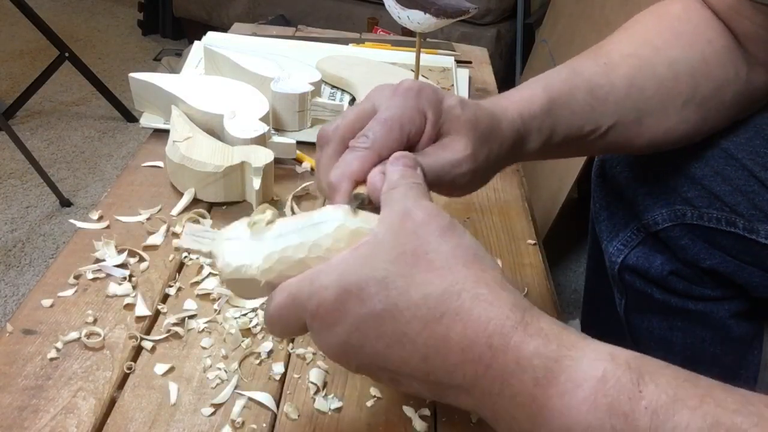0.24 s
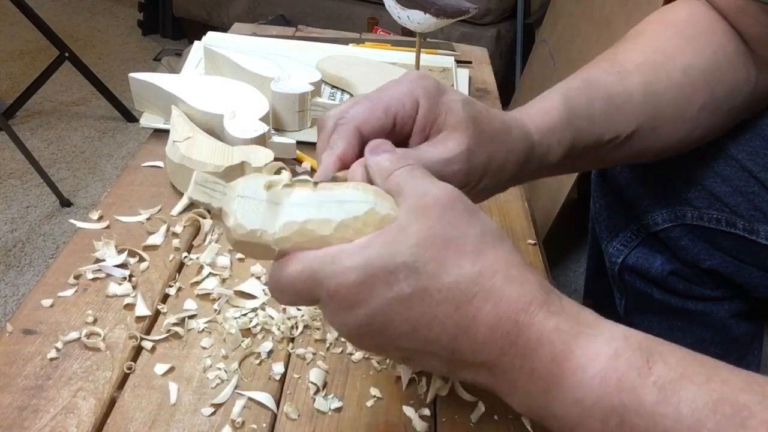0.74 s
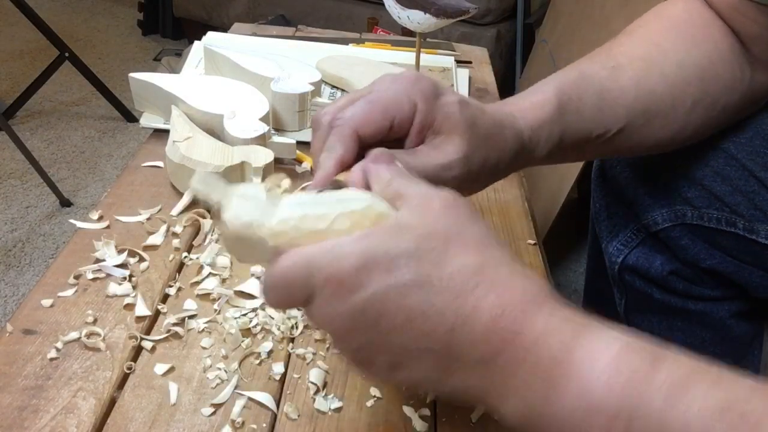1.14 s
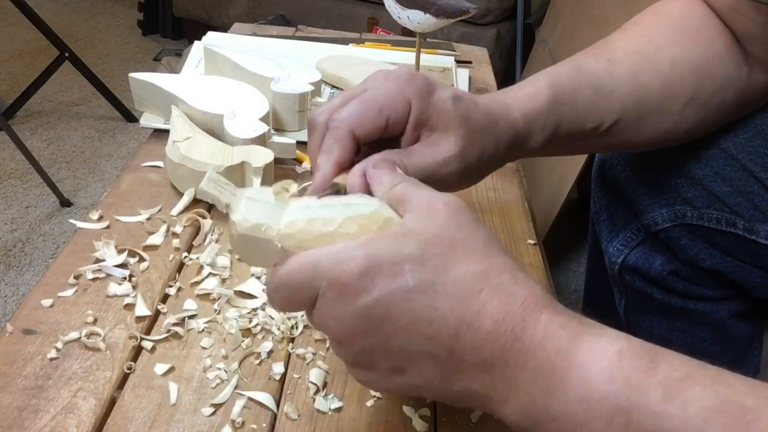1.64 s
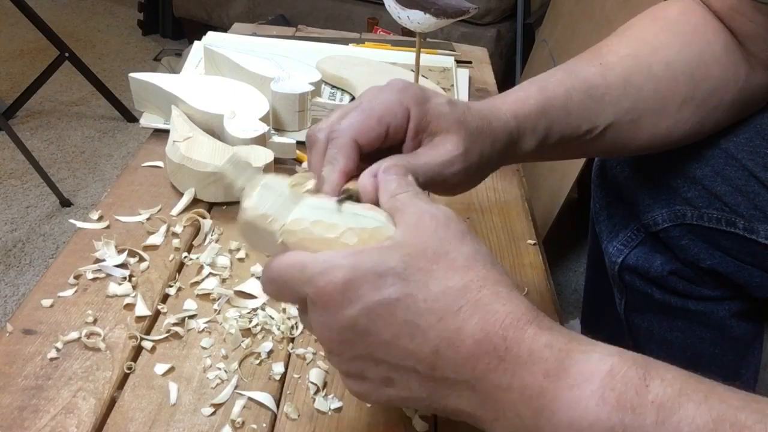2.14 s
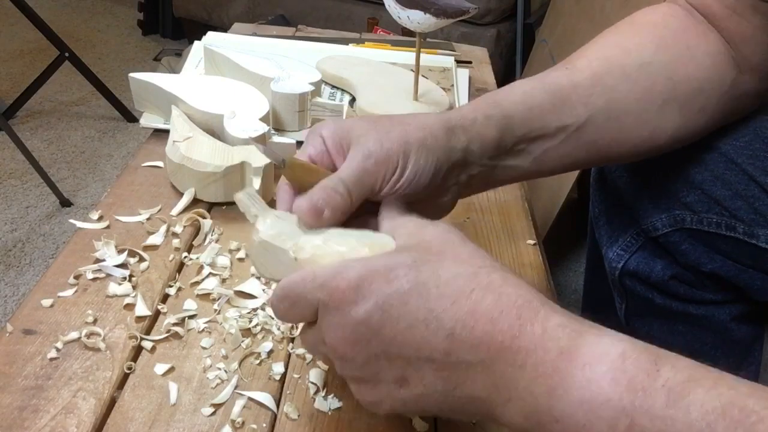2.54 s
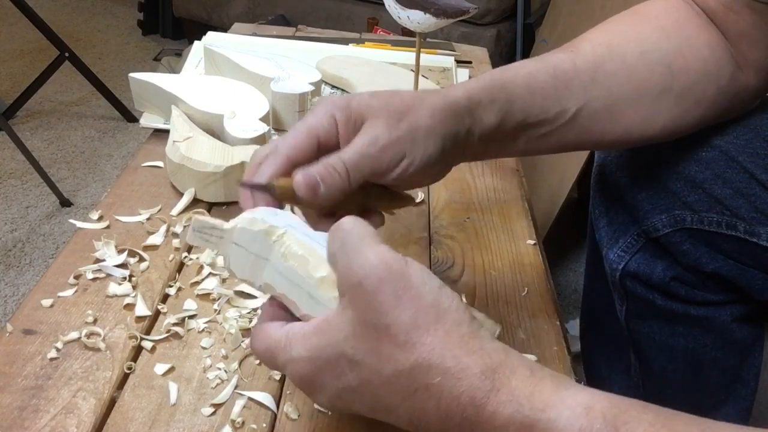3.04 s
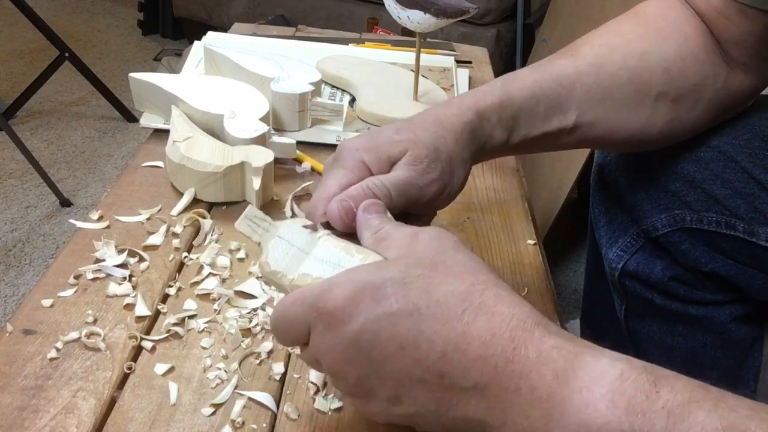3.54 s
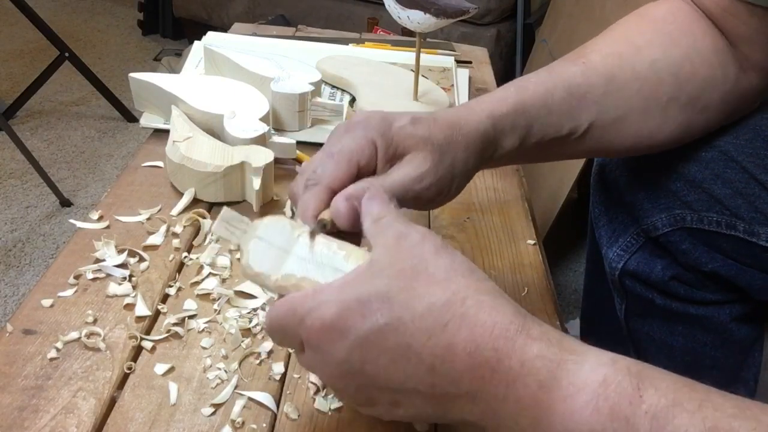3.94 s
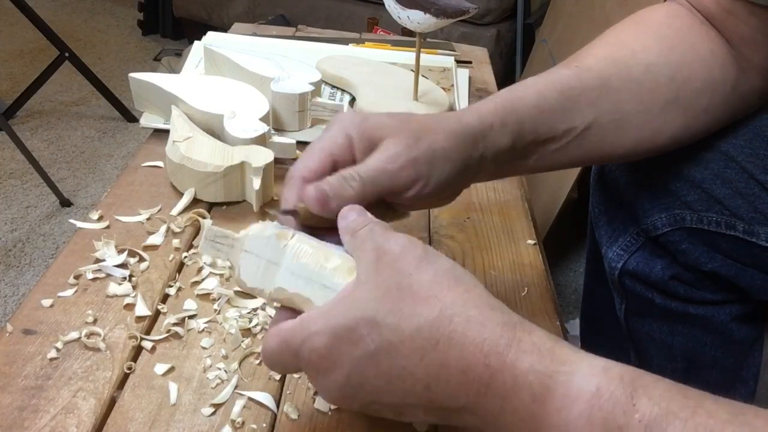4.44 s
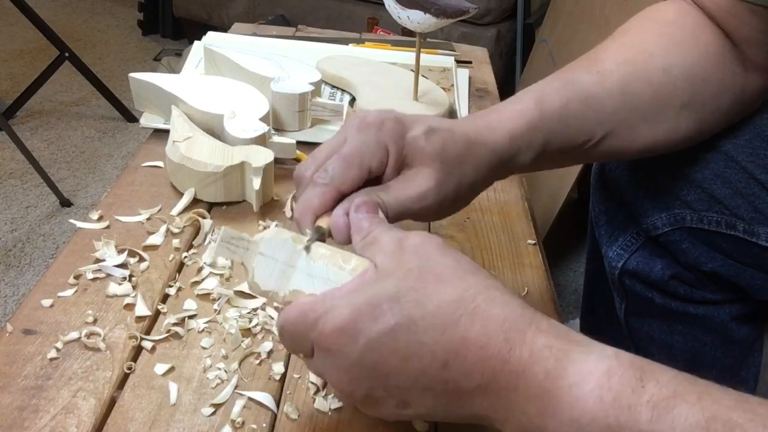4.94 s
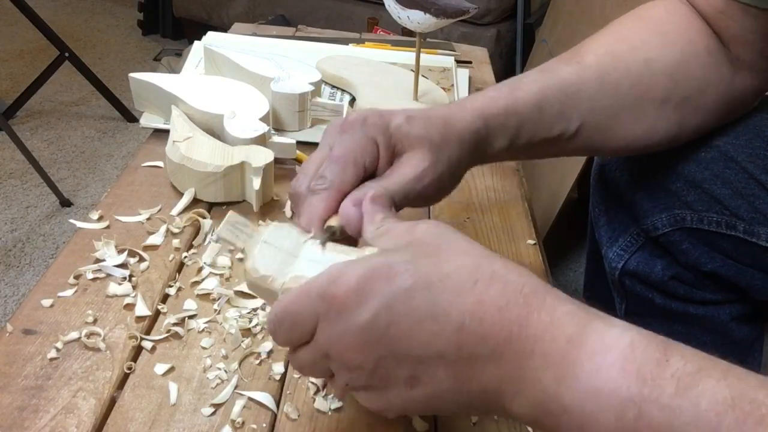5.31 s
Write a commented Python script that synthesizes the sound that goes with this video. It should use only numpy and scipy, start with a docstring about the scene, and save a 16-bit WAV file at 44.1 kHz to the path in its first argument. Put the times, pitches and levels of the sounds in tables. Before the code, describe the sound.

A small knife whittles a hand-held wooden block. Short, dry rasps end in crisp snaps as shavings break free, about two a second at first, some with a soft thud. Midway the cuts thin out into light scrapes and ticks of the blade, then a few quicker cuts follow near the end. The sound is close, in a quiet room with faint hum and hiss.

```python
"""Dry rasps end in sharp snaps: a small knife pares shavings off a hand-held wooden block.
The edge advances by stick-slip friction and cracks fibres until the shaving breaks free, often with
a soft thud as the block jolts in the hand. Between cuts the blade slides and ticks lightly on the wood.
Block and blade ring in their damped modes; bench and walls return a short, bright tail
over the low hum and hiss of a quiet room."""
import sys
import numpy as np
from scipy import signal
from scipy.fft import rfft, irfft
from scipy.io import wavfile

SR = 44100
rng = np.random.default_rng(int(sys.argv[2]) if len(sys.argv) > 2 else 0)


def to_wav(sig):
    """Store sig (one row per channel, or 1-D mono) as 16-bit WAV at the path in sys.argv[1].

    Samples outside -1..1 are clipped; the rate is SR.
    """
    pcm = np.clip(np.atleast_2d(sig), -1, 1) * 32767
    pcm = np.round(pcm).astype(np.int16)
    wavfile.write(sys.argv[1], SR, pcm.T)  # frames by channels


N = 245637

# Strokes of the edge; grip and angle set the colour. Body and fizz are relative to the crack band.
# bite_s, release_s, level_db, swell_db, upper_blade_hz, wood_hz, blade_hz, body_db, fizz_db
CUTS = [(0.173, 0.272, -74.5, 17.5, 13000, 1420, 7700, -8.5, -6.5),
        (0.538, 0.68, -66.5, 9, 13700, 1757, 7360, -5.5, -5.5),
        (0.965, 1.132, -71, 15.5, 13400, 1790, 8020, -5, -4.5),
        (1.487, 1.603, -66.5, 5, 12400, 1870, 7970, -4, -7),
        (1.84, 1.96, -68, -12, 12600, 2070, 7910, -3, -2),
        (2.216, 2.271, -61, 9.5, 11970, 2060, 5510, -13.5, -4),
        (2.502, 2.625, -68.5, 17.5, 12400, 2390, 7130, -4.5, -0.5),
        (3.463, 3.587, -69, 3, 12100, 2000, 6130, -6, -6),
        (3.974, 4.058, -68, 10, 14600, 2750, 8450, -3, -4),
        (4.787, 4.862, -68.5, 6.5, 12000, 2670, 6350, -0.5, -3),
        (5.057, 5.126, -64.5, 13, 14400, 1880, 6170, -7, -7),
        (5.331, 5.4, -59, -3, 12400, 1980, 6100, -5.5, -1.5),
        (5.522, 5.558, -63.5, 7.5, 10500, 2200, 6870, -13.5, -1)]
def cutting(click, trim_db=1.5, bite_s=0.0053, swell_s=0.025, release_s=0.011):
    """Friction noise follows force: the edge bites, holds, swells or eases near release, then lets go."""
    t, force = np.arange(N) / SR, np.zeros(N)
    for start, end, db, swell_db, *_ in CUTS:
        bite = np.clip((t - start) / bite_s, 0, 1)
        swell = gain_of(swell_db * np.exp(-abs(t - end) / swell_s))
        release = np.exp(-np.maximum(t - end, 0) / release_s)
        force += gain_of(db + trim_db) * bite * swell * release
    colour = curves([(s, *cut[4:]) for cut in CUTS for s in cut[:2]])
    return rasp(click, force, *colour, fibres_per_s=1600, spread_db=1.0, judder_db=2.0, slip_db=2.5)


# Resonances of block and blade that colour all rubbing: centre_hz, width_hz, gain_db
RUB_RESONANCES = [(2055, 250, -6.5), (2960, 490, -10), (5830, 300, -11.5), (7420, 255, -4.5),
                  (8740, 190, -4)]
def rasp(click, force, upper_hz, wood_hz, blade_hz, body_db, fizz_db,
         fibres_per_s, spread_db, judder_db, slip_db):
    """Stick-slip friction: a random train of fibre breaks, made uneven as the edge catches and slips."""
    density = np.maximum(force / gain_of(-67), 1) ** 0.9  # a deeper cut crackles more densely
    sizes = gain_of(spread_db * np.minimum(rng.exponential(1, N), 4))
    sizes = sizes * rng.choice([-1, 1], N) / np.sqrt(density)
    breaks = rng.random(N) < fibres_per_s * density / SR
    stick_slip = gain_of(judder_db * wander(rate_hz=650) + slip_db * wander(rate_hz=140))
    wood = signal.oaconvolve(sizes * breaks * stick_slip, click)[:N]
    wood = wood + sum(gain_of(db) * resonate(wood, hz, width) for hz, width, db in RUB_RESONANCES)
    knock, body, crack, fizz = split_bands(wood)
    body = emphasise(body, wood_hz, width_hz=600, share=0.28)
    crack = emphasise(crack, blade_hz, width_hz=520, share=0.52)
    fizz = emphasise(fizz, upper_hz, width_hz=900, share=0.35)
    return force * (crack + gain_of(body_db) * (body + gain_of(-14.5) * knock) + gain_of(fizz_db) * fizz)


# Spectrum of cracking wood: frequency_hz, gain_db
WOOD_SPECTRUM = [(300, -11.5), (700, -15.5), (1000, -19), (1400, -11), (2050, -9.5), (2900, -9.5),
                 (4300, -12.5), (5100, -5.5), (5950, 1), (6700, -2), (8400, -1), (10000, -9), (12500, -5.5),
                 (15500, -7)]
def fibre_click(size=1024):
    """Impulse response of one breaking fibre: a minimum-phase click with the spectrum of the wood."""
    log_gain = np.log(gain_of(spectrum_at(WOOD_SPECTRUM, abs(np.fft.fftfreq(size, 1 / SR)))))
    minimum_phase = np.exp(np.conj(signal.hilbert(log_gain)))
    return np.fft.ifft(minimum_phase).real[:size // 2]


# Shavings breaking free. Knock, body and fizz are relative to the crack band;
# ring is low where the blade stays pressed on the wood.
# centre_s, length_ms, level_db, knock_db, body_db, fizz_db, wood_hz, blade_hz, ring_db
SHAVING_SNAPS = [(0.288, 8.8, -50, -9, -16, -8, 1520, 8100, -2.5),
                 (0.6757, 5.8, -40.5, -32, -23, -4, 1510, 9000, -3.5),
                 (1.1267, 3.4, -39, -17.5, -13, 2, 3720, 6170, -4),
                 (1.1289, 2.74, -29.5, -34, -19, -6, 2520, 5250, 0.5),
                 (1.6043, 4.4, -37.5, -15, -8.5, -6.5, 1920, 5800, 2.5),
                 (1.607, 3.2, -37.5, -22, -11.5, -8.5, 3940, 6800, -8),
                 (1.9654, 0.76, -23, -25, -9, 3, 1730, 8870, -4),
                 (1.9672, 0.86, -19, -26.5, -18, -17, 1800, 6100, -2),
                 (1.97, 4.5, -33, -26.5, -18.5, -8, 3260, 7350, 5),
                 (1.986, 1.6, -37, -20, -11, -10.5, 1850, 7660, 0),
                 (2.6303, 0.62, -30.5, -43, -12, -7, 2720, 7150, -1.5),
                 (3.5754, 0.58, -30.5, -51, -10, -10, 3420, 9300, -2),
                 (3.5806, 2.2, -39.5, -23, -9.5, -11, 2640, 6500, -5),
                 (4.0489, 7.3, -56.5, -35, -2, -3, 3030, 8700, 1),
                 (4.8587, 2.9, -35, -21, -12, -9, 2740, 6460, -2),
                 (5.1047, 9.7, -42, -24, -9, -6, 1870, 6000, -7),
                 (5.1163, 1.83, -25.5, -15, -12.5, -25, 2100, 6330, -3.5),
                 (5.3994, 3.4, -35, -21, -5, -2.5, 2030, 8300, 2.5),
                 (5.4021, 1.6, -25.5, -29, -7.5, -7, 1840, 5330, -4.5)]
def snaps(click, rows, spread_db=2.0, skirt=0.39, wood_width_hz=280, blade_width_hz=600,
          wood_share=1.6, blade_share=1.0, size=2048):
    """Brittle fracture: a brief avalanche of cracks. Returns the direct sound and the part that rings."""
    direct, undamped = np.zeros(N), np.zeros(N)
    t = (np.arange(size) - size // 4) / SR
    for s, ms, db, knock_db, body_db, fizz_db, wood_hz, blade_hz, ring_db in rows:
        length_s = ms / 1000
        core = np.exp(-(t / (0.55 * length_s)) ** 4)
        flanks = np.exp(-abs(t) / length_s) * np.where(t < 0, 1, 0.5)  # soft lead-in, weaker fade after
        impulses = rng.standard_normal(size) * gain_of(spread_db * rng.standard_normal(size))
        burst = signal.fftconvolve((core + skirt * flanks) * impulses, click)[:size]
        knock, body, crack, fizz = split_bands(burst)
        knock = emphasise(knock, hz=970, width_hz=300, share=3.2)  # hollow note of the block
        body = emphasise(body, wood_hz, wood_width_hz, wood_share)
        crack = emphasise(crack, blade_hz, blade_width_hz, blade_share)
        colour = crack + gain_of(knock_db) * knock + gain_of(body_db) * body + gain_of(fizz_db) * fizz
        snap = gain_of(db) * np.sqrt(length_s * SR / size) * colour  # energy grows with duration
        add(direct, s + t[0], snap)
        add(undamped, s + t[0], gain_of(ring_db) * snap)
    return direct, undamped


# Fibres giving way around the edge: centre_s, length_ms, level_db
FIBRE_CRACKS = [(0.2594, 0.9, -54), (0.2794, 4.9, -51), (0.6085, 0.92, -48), (0.6293, 2.1, -45.5),
                (0.6337, 0.5, -42), (0.662, 1, -47), (1.1097, 1.6, -53.5), (1.524, 4.3, -58),
                (1.5774, 4.2, -49.5), (1.8973, 5.6, -54.5), (2.223, 3.9, -56), (2.5441, 2.9, -45.5),
                (3.5965, 1.1, -46.5), (3.983, 2.4, -63), (4.032, 4.6, -62), (4.853, 0.49, -42),
                (5.088, 3, -50.5), (5.1125, 2.4, -40.5), (5.3277, 3.3, -50.5), (5.3547, 3, -52),
                (5.3704, 2.2, -52), (5.3754, 1.4, -55), (5.3853, 1.7, -51)]
def fibre_cracks(click, knock_db=-21, ring_db=2):
    """Local fracture: overstressed fibres give small snaps with the colour of the nearest cut."""
    rows = []
    for s, ms, db in FIBRE_CRACKS:
        nearest_cut = min(CUTS, key=lambda cut: abs((cut[0] + cut[1]) / 2 - s))
        *_, wood_hz, blade_hz, body_db, fizz_db = nearest_cut
        rows.append((s, ms, db, knock_db, body_db - 1, fizz_db - 1, wood_hz, blade_hz, ring_db))
    return snaps(click, rows, skirt=0.12, wood_share=0.47, blade_share=0.57)


# Taps as the blade is set down or lifted: centre_s, length_ms, level_db, body_db, fizz_db, wood_hz
BLADE_TICKS = [(1.2518, 1.3, -56, -4.5, 5.5, 3510), (1.7155, 2.6, -52, -4.5, -5.5, 4070),
               (2.122, 3.7, -62, -1, 2.5, 4130), (2.2968, 0.52, -57, -2.5, 5, 3530),
               (2.399, 1.3, -63, 0.5, 2, 4250), (2.4164, 0.33, -55.5, -6, -3, 4300),
               (3.014, 1.7, -58, 2, -12, 3550), (3.199, 0.81, -56, -2.5, -5, 2560),
               (3.6952, 0.76, -32, -4, -28, 3220), (3.6994, 1.3, -36.5, -6, -24, 3250),
               (3.703, 0.33, -37.5, -6, -3.5, 1870), (3.9001, 1.5, -53.5, 9, -10, 2420),
               (4.115, 0.8, -56.5, 2, 1, 3550), (4.2274, 2.6, -44, -4, -4.5, 3960),
               (4.2463, 1.3, -57, -23, -12, 4200), (4.3283, 0.88, -54.5, -0.5, -0.5, 2700),
               (4.6336, 1.14, -55.5, -3, -30, 4360), (4.653, 1.4, -60, -1, -24, 4370)]
def blade_ticks(click, blade_hz=5900, ring_db=-5):
    """Damped impact: each tap is a small, dry snap, since the wood damps the resting blade."""
    rows = [(s, ms, db, body_db - 20, body_db, fizz_db, wood_hz, blade_hz, ring_db)
            for s, ms, db, body_db, fizz_db, wood_hz in BLADE_TICKS]
    return snaps(click, rows, spread_db=7, skirt=0.1, wood_width_hz=450, blade_width_hz=650,
                 wood_share=3.4)


# Blade and fingers brushing the block: centre_s, length_s, level_db, blade_hz, fizz_db
SLIDES = [(0.003, 0.072, -64, 5640, -5), (0.128, 0.054, -63.5, 5600, -8), (0.37, 0.053, -65.5, 7900, -5),
          (0.419, 0.019, -65.5, 7000, -8), (0.807, 0.18, -76, 7250, -5), (1.213, .12, -75.5, 7900, 0),
          (1.388, 0.041, -72, 7650, -13), (1.769, 0.011, -63.5, 7900, -5), (2.124, 0.11, -65.5, 7700, -4),
          (2.359, 0.047, -66.5, 7140, -7), (2.687, 0.065, -62.5, 7120, -3),
          (2.772, 0.044, -65.5, 7400, -1.5), (2.912, 0.057, -57, 7260, -0.5),
          (3.055, 0.11, -71.5, 7200, -2.5), (3.217, 0.18, -85, 6900, -2), (3.41, 0.16, -72.5, 5850, -8),
          (3.688, 0.21, -75, 5860, -3), (4.123, 0.039, -62, 6100, -2), (4.212, 0.064, -66, 6100, -14),
          (4.515, 0.12, -74, 7140, -7), (4.673, 0.031, -66.5, 5700, -12), (4.996, 0.066, -68, 6070, -10)]
def sliding(click, trim_db=-3.5, handling_db=-87):
    """Light sliding friction: contact force rises and falls in a bell, with a finer grain than a cut."""
    t = np.arange(N) / SR
    force = np.full(N, gain_of(handling_db))  # the hands never rest entirely
    for s, length_s, db, *_ in SLIDES:
        force += gain_of(db + trim_db) * np.exp(-(2 * (t - s) / length_s) ** 2)
    blade_hz, fizz_db = curves([(s, *colour) for s, _, _, *colour in SLIDES])
    return rasp(click, force, upper_hz=11300, wood_hz=2290, blade_hz=blade_hz, body_db=-9.5,
                fizz_db=fizz_db, fibres_per_s=2600, spread_db=-0.5, judder_db=1.9, slip_db=3.0)


# Jolts of the block as the blade comes free: start_s, level_db, pitch_hz
THUDS = [(0.292, -65, 120), (0.681, -59, 118), (1.13, -49.5, 123), (1.604, -44, 139), (1.968, -43, 148),
         (4.858, -54, 222), (5.116, -55, 156), (5.401, -52.5, 197)]
def thuds(rise_s=0.0028):
    """Heavily damped oscillation: suddenly unloaded, the hand-held block swings two or three cycles."""
    out, t = np.zeros(N), np.arange(SR // 10) / SR
    envelope = t / rise_s * np.exp(1 - t / rise_s)
    for s, db, hz in THUDS:
        add(out, s, -gain_of(db) * envelope * np.sin(2 * np.pi * hz * t))
    return out


# Natural modes of blade and block: pitch_hz, relative_db, t60_s
MODES = [(5500, -8, 0.059), (5670, -22, 0.089), (5870, -13.5, .12), (6450, -22, 0.076), (7400, -19, 0.196),
         (7870, -7.5, 0.058), (8020, -12, 0.097), (9390, 20.5, 0.043), (11100, -12, 0.16),
         (12400, -7.5, 0.078), (14200, 11, .11), (13900, -21, .1)]
def ringing(excitation, level_db=-29, build_s=0.0049):
    """Free vibration: every crack excites modes that take a moment to build, then decay exponentially."""
    t = np.arange(SR // 4) / SR
    modes = sum(gain_of(db) * decay(t, t60_s) * np.sin(2 * np.pi * (hz * t + rng.random()))
                for hz, db, t60_s in MODES)
    modes = modes * (1 - np.exp(-t / build_s))
    return gain_of(level_db) * signal.oaconvolve(excitation, modes / np.linalg.norm(modes))[:N]


# Early reflections off bench, hands and walls: delay_s, relative_gain
REFLECTIONS = [(.0031, 0.11), (.0056, .07), (.0069, .05), (0.011, 0.082), (.0122, .04), (.0205, 0.03)]
# Spectrum of the diffuse tail: frequency_hz, relative_db
TAIL_SPECTRUM = [(300, 2), (700, 1), (1500, -5.5), (3700, 4.5), (5000, 3), (6000, -4), (7400, 4), (8800, 1),
                 (10500, 4), (12500, -1.5), (15500, -4.5)]
# Reverberation time: frequency_hz, t60_s
ROOM_T60 = [(300, 0.22), (1300, 0.15), (3500, 0.13), (7500, 0.17), (14000, 0.14)]
def room(source, tail_db=-15, reflection_db=1.5, build_s=0.004):
    """Reverberation: a few close reflections, and a diffuse tail whose decay depends on frequency."""
    hz, t, noise = signal.stft(rng.standard_normal(SR // 2), SR, nperseg=256)
    colour = gain_of(spectrum_at(TAIL_SPECTRUM, hz))[:, None]
    envelope = decay(t, spectrum_at(ROOM_T60, hz)[:, None]) * (1 - np.exp(-t / build_s))
    tail = signal.istft(noise * colour * envelope, SR)[1]
    response = gain_of(tail_db) * tail / np.linalg.norm(tail)
    for delay_s, gain in REFLECTIONS:
        add(response, delay_s, np.array([gain * gain_of(reflection_db)]))
    return signal.oaconvolve(source, response)[:N]


# Spectral density of the room noise: frequency_hz, relative_db
AIR_SPECTRUM = [(25, -34), (45, -7), (70, -13), (110, -1), (160, 1), (230, -4.5), (340, -4), (520, -7),
                (800, -13.5), (1600, -16), (3000, -19.5), (4600, -21), (6200, -22.5), (10000, -25.5),
                (16000, -28.5)]
# Partials of the hum, ahead of the swell: pitch_hz, start_level_db, end_level_db
HUM_PARTIALS = [(122, -80, -92.5), (241.7, -75, -95.5), (328, -79.5, -76.5), (516, -85.5, -81.5)]
# Slight swell of the low noise and hum: time_s, gain_db
LOW_SWELL = [(0, -5.5), (.6, -2.5), (1.5, -1), (2.3, -0.3), (5.57, -0.5)]
def background(air_db=-67.39, split_hz=800, waver_rad=0.94, waver_hz=16):
    """Ambient noise floor: low noise and a phase-modulated hum swell slightly under a steady hiss."""
    hz, t = np.fft.rfftfreq(N, 1 / SR), np.arange(N) / SR
    spectrum = rfft(rng.standard_normal(N)) * gain_of(spectrum_at(AIR_SPECTRUM, hz))
    air = gain_of(air_db) * unit_rms(irfft(spectrum, N))
    low = irfft(rfft(air) / (1 + (hz / split_hz) ** 2), N)
    hiss = air - low
    hum = np.zeros(N)
    for pitch_hz, start_db, end_db in HUM_PARTIALS:
        phase = 2 * np.pi * pitch_hz * t + waver_rad * wander(waver_hz)
        hum += gain_of(np.linspace(start_db, end_db, N)) * unit_rms(np.sin(phase))
    swell_db, = curves(LOW_SWELL)
    return gain_of(swell_db) * (low + hum) + hiss


# Knock, body, crack and fizz bands of the wood's sound: low_hz, high_hz
BAND_EDGES = [(500, 1300), (1500, 4500), (4500, 10000), (10000, 16000)]
def split_bands(x):
    """Causal filter bank: four bands, each at unit rms."""
    filters = [signal.butter(3, edges, "band", fs=SR, output="sos") for edges in BAND_EDGES]
    return [unit_rms(signal.sosfilt(sos, x)) for sos in filters]


def resonate(x, hz, width_hz):
    """Damped resonator of unit gain; its centre frequency may be a number or a curve."""
    carrier = np.exp(2j * np.pi * np.cumsum(hz * np.ones(len(x))) / SR)
    pole = np.exp(-np.pi * width_hz / SR)
    return 2 * (carrier * signal.lfilter([1 - pole], [1, -pole], x / carrier)).real


def emphasise(x, hz, width_hz, share):
    """Resonant emphasis: adds one spectral peak and returns the sum at unit rms."""
    return unit_rms(x + share * unit_rms(resonate(x, hz, width_hz)))


def wander(rate_hz):
    """Smooth random modulation at unit rms."""
    knots = np.arange(N) * rate_hz / SR
    return unit_rms(np.interp(knots, np.arange(N), rng.standard_normal(N)))


def decay(t, t60_s):
    """Exponential decay, 60 dB down at t60_s."""
    return np.exp(-np.log(1000) * t / t60_s)


def gain_of(db):
    """Decibels to amplitude."""
    return 10 ** (np.asarray(db) / 20)


def unit_rms(x):
    """Normalisation to an rms of one."""
    return x / np.sqrt(np.mean(x ** 2) + 1e-20)


def spectrum_at(points, hz):
    """Interpolation of a table on a log-frequency axis."""
    points_hz, values = np.transpose(points)
    return np.interp(np.log(hz + 1), np.log(points_hz + 1), values)


def curves(rows):
    """Interpolation of each column of a time table, sample by sample."""
    times_s, *columns = np.transpose(rows)
    return [np.interp(np.arange(N) / SR, times_s, column) for column in columns]


def add(mix, start_s, sound):
    """Superposition of a sound on the mix."""
    part = mix[max(0, round(start_s * SR)):][:len(sound)]
    part += sound[:len(part)]


def scene():
    """Source and resonator: fracture and friction drive the modes of blade and block, then the room."""
    click = fibre_click()
    cracks, undamped = np.sum([snaps(click, SHAVING_SNAPS), fibre_cracks(click), blade_ticks(click)], 0)
    friction = cutting(click) + sliding(click)
    ring = ringing(undamped + friction)
    reverberation = room(undamped + friction + ring)
    return (cracks + friction + ring + reverberation + thuds() + background())[None]


def record(dry, bass_cut_hz=60, band_limit_hz=15850):
    """Band limiting: the microphone cuts the deep bass and the highest treble."""
    thin = signal.sosfilt(signal.butter(7, bass_cut_hz, "high", fs=SR, output="sos"), dry)
    low_pass = signal.firwin(201, band_limit_hz, window=("kaiser", 8), fs=SR)
    return signal.oaconvolve(thin, low_pass[None], "same")


dry = scene()
out = record(dry)
to_wav(out)
```